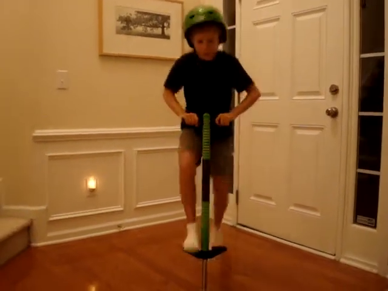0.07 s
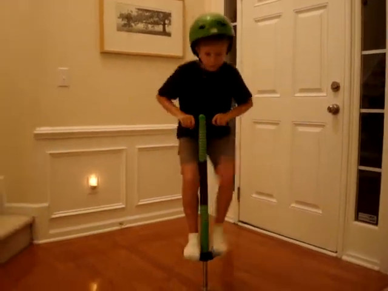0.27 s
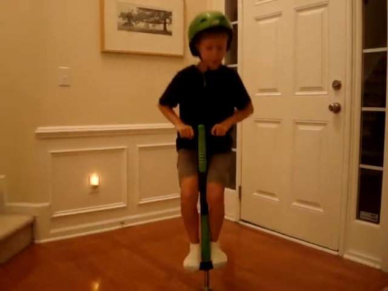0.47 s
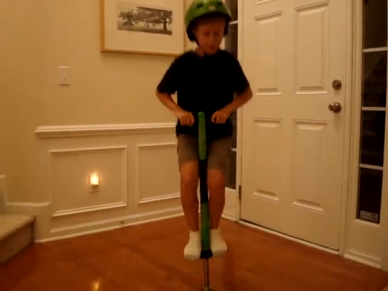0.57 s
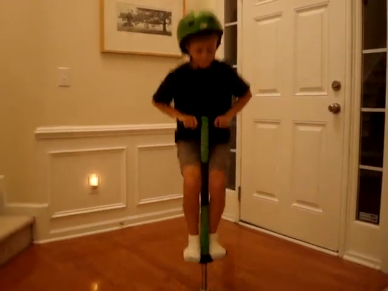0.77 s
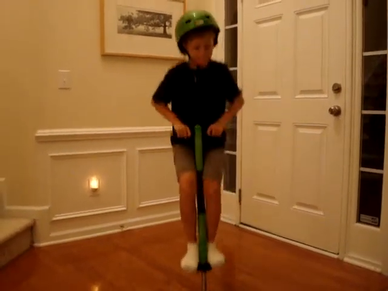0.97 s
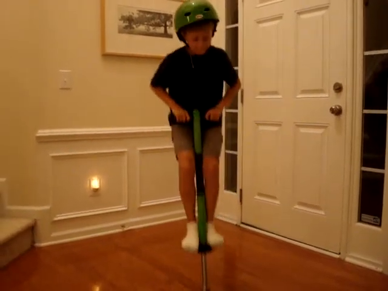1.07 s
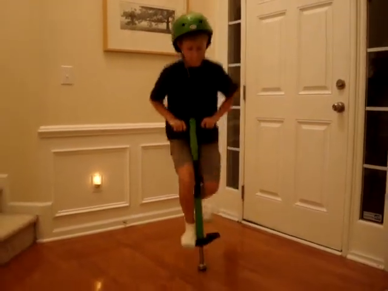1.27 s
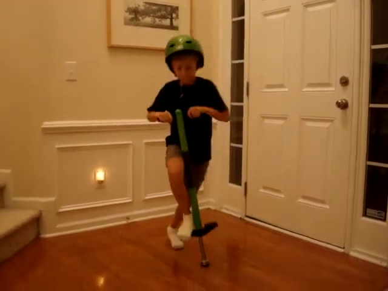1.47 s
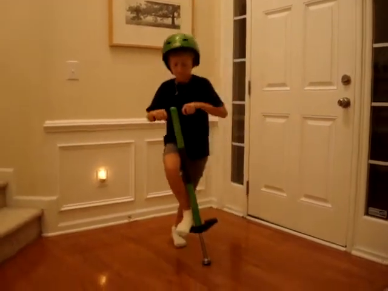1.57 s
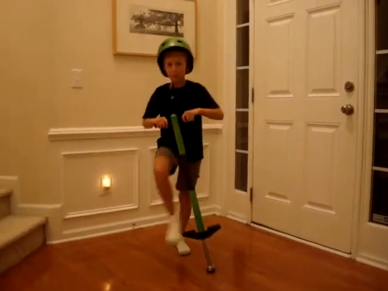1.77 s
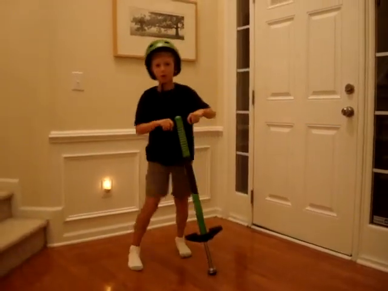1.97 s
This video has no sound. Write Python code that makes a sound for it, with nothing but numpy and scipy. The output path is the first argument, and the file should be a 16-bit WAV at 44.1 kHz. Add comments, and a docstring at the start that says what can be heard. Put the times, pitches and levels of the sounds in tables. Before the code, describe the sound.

A pogo stick bounces on hardwood in a bare, echoing hall: a light scuff and clack, a short high squeak, then three louder metallic clacks with spring chatter, ending in faint scuffs, heard from a few metres.

```python
"""Pogo stick in a bare hall

A spring pogo stick is mounted and bounced on a hardwood floor, the microphone a few metres away.
After a faint rustle, tiny contacts ring the steel as the spring chatters; the shaft clacks on its stop.
Rising tones squeak inside dry rubs, slips scuff on the wood, and the floorboards thump in broad resonances.
Random dense echoes surround the stick; a soft hissing scuff closes, over sinking room tone."""
import sys
import numpy as np
from scipy import signal
from scipy.fft import rfft, irfft, next_fast_len
from scipy.io import wavfile
from scipy.ndimage import uniform_filter1d

SR = 44100
rng = np.random.default_rng(int(sys.argv[2]) if len(sys.argv) > 2 else 0)


def inscribe(sig):
    """Save sig as 16-bit PCM at rate SR to the path in sys.argv[1].

    A 1-D sig is mono; a 2-D sig holds one channel per row.
    Samples are clipped to [-1, 1] before scaling.
    """
    pcm = np.round(np.clip(np.atleast_2d(sig).T, -1, 1) * 32767)
    wavfile.write(sys.argv[1], SR, pcm.astype(np.int16))


N = 88596
TIME = np.arange(N) / SR  # s

# Source levels are set before any direct gain, steel ringing or hall.
# Swell is the rise time, fade the 1/e decay time; tilt pivots at 2 kHz.

# spectrum of the room's background noise: f/Hz, level/dB
AIR_COLOUR = [(25, -22), (70, -5), (120, 4.5), (180, -1), (340, 5.5), (900, 3), (1300, 1), (1650, 0.5),
              (3000, -5.5), (7000, -9), (10000, -14.5)]
AIR_START_DB, AIR_FALL_DB_PER_S = -49.5, 3
WHINE_HZ, WHINE_DB, WHINE_WIDTH_HZ = 7470, -69, 40

# a faint rustle at the start, then brief metallic rings as the spring flexes:
# t/s, level/dB, swell/s, fade/s, f/Hz, width/Hz
RUSTLE_AND_RINGS = [(0.066, -56.5, 0.02, 0.1, 1620, 180), (0.736, -31, 0.035, 0.048, 1657, 101),
                    (1.191, -22, .014, 0.01, 1730, 110), (1.715, -46, 0.014, 0.029, 1436, 50)]

# modes of the steel tube and spring: f/Hz, level over the contact noise/dB, t60/s
STEEL_MODES = [(1054, -4.5, 0.069), (1474, -12.5, 0.22), (1600, 5, 0.13), (1720, -0.5, 0.26),
               (1877, 0, 0.52), (1995, -22, 0.44), (2285, -12, 0.15), (2446, 7, 0.47), (2940, -9, .25),
               (3000, -20.5, 0.41), (4350, -4.5, 0.02), (5360, -15.5, 0.21), (6500, -1.5, 0.22),
               (6810, 1.5, 0.072)]
CONTACTS_PER_S, SLIPS_PER_S, CONTACT_SPREAD_DB = 3000, 3000, 2

# reverberation time of the hall by band: f/Hz, t60/s
HALL_T60 = [(150, 0.72), (800, 0.72), (2000, 0.68), (5500, 0.52), (10000, 0.47)]
HALL_LENGTH_S, HALL_GAP_S, HALL_BUILD_S = 0.8, 0.0015, 0.0032
HALL_DB, DIRECT_DB = 0.5, 4

# the shaft hits its stop: t/s, crack level/dB, rattle level/dB, rattle swell/s, rattle fade/s,
# rattle tilt/(dB per octave)
STOP_BLOWS = [(0.2490, -27.5, -33.5, 0.01, 0.03, 1.0), (0.7253, -13.5, -23, .004, 0.054, -2),
              (1.167, -13, -24, 0.013, 0.044, -2), (1.3478, -13, -21.5, 0.032, 0.021, -0.5)]
# spectrum of crack and rattle: f/Hz, level/dB
CLACK_COLOUR = [(60, -57), (140, -38), (260, -33.5), (450, -13.5), (700, -5.5), (1100, 1), (1700, 0),
                (2600, 3.5), (4500, 1), (7000, -0.5), (10000, -11.5)]
CRACK_FADE_S, CRACK_TO_HALL_DB = 0.0055, -7.5

# hollow scuffs, as of rubber on wood: t/s, level/dB, swell/s, fade/s, lower f/Hz, upper f/Hz,
# upper level against lower/dB
SCUFFS = [(0.257, -25, .024, 0.031, 928, 1720, -6.5), (0.595, -35, 0.05, 0.046, 1145, 1480, -4.5),
          (1.382, -26, 0.008, 0.056, 832, 1410, 1), (1.667, -43.5, 0.033, .020, 993, 1190, -9),
          (1.700, -43, 0.035, 0.012, 956, 1410, 9)]
SCUFF_WIDTH_HZ, SCUFF_LOW_CUT_HZ, SCUFF_HISS_DB = 200, 710, -24

# the shaft squeaks in its guide: t at the loudest/s, level/dB, 1/e half length/s, middle f/Hz,
# level sent into the hall/dB
SQUEAKS = [(0.2707, -22, 0.0057, 4290, -7.5), (0.445, -30.5, 0.012, 3460, -0.5),
           (0.4625, -10, 0.007, 3515, -5)]
# spectrum of the dry rub around each squeak: f/Hz, level/dB
RUB_COLOUR = [(200, -27), (1000, -7), (2500, -4.5), (3500, -1.5), (4800, -3), (6800, -3), (8000, -13.5),
              (10000, -20.5)]
SQUEAK_RISE_HZ, SQUEAK_JITTER_HZ = 130, 79  # rise each side of the middle; rms jitter
OCTAVE_DB = -23
RUB_DB, RUB_HALF_S = -24.5, 0.021  # level against the squeak; 1/e half length

# the spring chatters in the tube; the last row is the soft hiss of the closing scuff:
# t/s, level/dB, swell/s, fade/s, tilt/(dB per octave)
CHATTERS_AND_HISS = [(0.306, -41, 0.026, 0.053, 3), (0.500, -45.5, 0.085, 0.046, 2.9),
                     (0.642, -28, 0.013, 0.025, -1.0), (0.849, -35, 0.037, 0.093, -3.5),
                     (0.952, -28, 0.025, 0.053, 0.5), (1.055, -29, .020, 0.049, 0.4),
                     (1.103, -26, 0.018, 0.038, 2.1), (1.255, -43, 0.026, 0.012, -1.5),
                     (1.449, -38, 0.017, 0.012, 1.5), (1.527, -33.5, 0.0097, 0.034, 3.1),
                     (1.705, -48.5, 0.012, 0.021, 0)]
# spectrum of the chatter and the hiss: f/Hz, level/dB
CHATTER_COLOUR = [(60, -51.5), (150, -36.5), (300, -16), (480, -5), (680, 6.5), (1050, 6), (1700, 3),
                  (3000, 1.5), (4300, 1), (7000, -4.5), (10000, -16)]

# the foot loads the floorboards: t/s, level/dB, swell/s, fade/s, lower resonance f/Hz
THUMPS = [(0.439, -51, 0.011, 0.021, 372), (0.645, -41, 0.0088, 0.0085, 381),
          (0.821, -39, .030, 0.043, 158.3), (1.107, -35, 0.014, 0.0063, 375),
          (1.344, -44.5, .003, 0.016, 200)]
BOARD_RATIO, BOARD_WIDTH_HZ, BOARD_UPPER_DB = 2.15, 58, 1.5
BOARD_GRAIN_DB, BOARD_LOW_CUT_HZ = -4.5, 110  # broad rumble beside the resonances; lower edge

# short low jolts that come with the squeak and the clacks: t/s, level/dB, f of the push/Hz
JOLTS = [(0.463, -49, 130), (0.724, -43, 110), (1.167, -46, 130), (1.3450, -48, 330)]
JOLT_LOW_CUT_HZ = 25

CUTOFF_HZ = 10100  # top of the recorded band


def from_db(db):
    """Decibels to gain."""
    return 10 ** (np.asarray(db) / 20)


def rms_one(x):
    """Scale to unit power."""
    return x / np.sqrt(np.mean(x ** 2) + 1e-20)


def at_hz(points, hz):
    """Read a table on a log-frequency axis."""
    f, value = np.transpose(points)
    return np.interp(np.log(hz + 1e-9), np.log(f), value)


def colour(x, points, tilt_db=0):
    """Causal (minimum-phase) filter with the given curve, tilted about 2 kHz; unit power gain."""
    size = 2 * next_fast_len(N // 2 + 4096)
    hz = np.arange(size // 2 + 1) * SR / size
    db = at_hz(points, hz) + tilt_db * np.log2(np.clip(hz, 300, 10000) / 2000)
    db = db - np.clip((hz - CUTOFF_HZ) / 100, 0, 30)
    # folding the cepstrum onto positive times gives minimum phase
    cepstrum = irfft(np.log(rms_one(from_db(db))))
    cepstrum[1:size // 2] *= 2
    cepstrum[size // 2 + 1:] = 0
    response = np.exp(rfft(cepstrum))
    return irfft(rfft(x, size) * response)[:N]


def resonate(x, hz, width_hz):
    """One resonance with gain 1 on top."""
    r = np.exp(-np.pi * width_hz / SR)
    numerator = np.array([1, 0, -1]) * (1 - r * r) / 2
    denominator = [1, -2 * r * np.cos(2 * np.pi * hz / SR), r * r]
    return signal.lfilter(numerator, denominator, x + 1e-18)


def high_pass(x, order, hz):
    """Butterworth low cut."""
    return signal.sosfilt(signal.butter(order, hz, "high", fs=SR, output="sos"), x)


def stroke(start, swell, fade):
    """Envelope that swells to 1 and dies away."""
    age = TIME - start
    rise = np.sqrt(np.clip(age / max(swell, 1e-4), 0, 1))
    return rise * np.exp(-np.maximum(age - swell, 0) / max(fade, 1e-4))


def contacts(per_s):
    """Uneven tiny impacts at random moments, with an even mean power."""
    sizes = from_db(CONTACT_SPREAD_DB * rng.standard_normal(N)) * rng.choice([-1, 1], N)
    clicks = sizes * (rng.random(N) < per_s / SR)
    local_power = np.abs(uniform_filter1d(clicks ** 2, size=500))
    return clicks / np.sqrt(local_power + 1e-6)


def room_tone():
    """Soft, slowly sinking background noise with a thin, steady high whine."""
    air_gain = from_db(AIR_START_DB - AIR_FALL_DB_PER_S * TIME)
    air = air_gain * colour(rng.standard_normal(N), AIR_COLOUR)
    whine = rms_one(resonate(rng.standard_normal(N), WHINE_HZ, WHINE_WIDTH_HZ))
    return air + from_db(WHINE_DB) * whine


def rustle_and_rings():
    """Small contacts through one resonance each: first a faint rustle, then rings of the flexing spring."""
    out = 0
    for s, db, swell, fade, hz, width_hz in RUSTLE_AND_RINGS:
        band = rms_one(resonate(contacts(SLIPS_PER_S), hz, width_hz))
        out = out + from_db(db) * stroke(s, swell, fade) * band
    return out


def steel(x):
    """Contacts set the tube and spring ringing; each mode's width follows from its decay time."""
    ringing = 0
    for hz, db, t60 in STEEL_MODES:
        width_hz = np.log(1000) / np.pi / t60
        ringing = ringing + from_db(db) * resonate(x, hz, width_hz)
    return x + ringing


def hall(x):
    """Dense reflections that build fast and die band by band; new each call, as the stick moves about."""
    size = int(HALL_LENGTH_S * SR)
    noise = rfft(rng.standard_normal(size))
    hz = np.arange(size // 2 + 1) * SR / size
    t = TIME[:size]
    tail = 0
    for centre, t60 in HALL_T60:
        # overlapping bands that add up to 1
        share = at_hz([(f, f == centre) for f, _ in HALL_T60], hz)
        tail = tail + irfft(noise * share, size) * from_db(-60 * t / t60)
    tail = tail * np.clip((t - HALL_GAP_S) / HALL_BUILD_S, 0, 1)
    unit_energy_tail = rms_one(tail) / np.sqrt(size)
    return from_db(HALL_DB) * signal.fftconvolve(x, unit_energy_tail)[:N]


def clacks():
    """Each blow on the stop is a sharp crack, then loose parts rattle; each has echoes of its own."""
    out = 0
    for s, crack_db, rattle_db, swell, fade, tilt_db in STOP_BLOWS:
        blow = from_db(crack_db) * stroke(s, 0, CRACK_FADE_S) * rng.choice([-1, 1], N)
        crack = steel(colour(blow, CLACK_COLOUR, tilt_db=-2.0))
        knocks = from_db(rattle_db) * stroke(s, swell, fade) * contacts(CONTACTS_PER_S)
        rattle = steel(colour(knocks, CLACK_COLOUR, tilt_db))
        echoes = hall(rattle + from_db(CRACK_TO_HALL_DB) * crack)
        out = out + crack + from_db(DIRECT_DB) * rattle + echoes
    return out


def scuffs():
    """Rapid slips excite two hollow resonances and a little hiss."""
    out = 0
    for s, db, swell, fade, low_hz, high_hz, high_db in SCUFFS:
        slips = contacts(SLIPS_PER_S)
        lower = resonate(slips, low_hz, SCUFF_WIDTH_HZ)
        upper = resonate(slips, high_hz, SCUFF_WIDTH_HZ * high_hz / low_hz)
        body = lower + from_db(high_db) * upper
        body = signal.sosfilt(signal.butter(2, 2 * high_hz, fs=SR, output="sos"), body)
        scuff = rms_one(body) + from_db(SCUFF_HISS_DB) * slips
        out = out + from_db(db) * stroke(s, swell, fade) * scuff
    return high_pass(out, 5, SCUFF_LOW_CUT_HZ)


def squeaks():
    """Short rising stick-slip tones, each inside a longer dry rub, with their echoes."""
    tones, sent, rub_level = 0, 0, 0
    for s, db, half, hz, hall_db in SQUEAKS:
        age = TIME - s
        jitter = rms_one(uniform_filter1d(rng.standard_normal(N), size=80))
        pitch = hz + SQUEAK_RISE_HZ * np.tanh(age / half) + SQUEAK_JITTER_HZ * jitter
        phase = 2 * np.pi * np.cumsum(pitch) / SR
        wave = np.sin(phase) + from_db(OCTAVE_DB) * np.sin(2 * phase)
        tone = from_db(db) * np.exp(-(age / half) ** 2) * wave
        tones = tones + tone
        sent = sent + from_db(hall_db) * tone
        rub_level = rub_level + from_db(db + RUB_DB) * np.exp(-(age / RUB_HALF_S) ** 2)
    rub = colour(rub_level * contacts(SLIPS_PER_S), RUB_COLOUR)
    return tones + from_db(DIRECT_DB) * rub + hall(sent + rub)


def chatter_and_hiss():
    """Coils scrape along the tube in bursts of small contacts; a last burst is the closing scuff's hiss."""
    out = 0
    for s, db, swell, fade, tilt_db in CHATTERS_AND_HISS:
        burst = from_db(db) * stroke(s, swell, fade) * contacts(CONTACTS_PER_S)
        out = out + colour(burst, CHATTER_COLOUR, tilt_db)
    return out


def floorboards():
    """The boards rumble in two resonances and a broad grain as the weight comes down."""
    out = 0
    for s, db, swell, fade, hz in THUMPS:
        push = contacts(CONTACTS_PER_S)
        lower = resonate(push, hz, BOARD_WIDTH_HZ)
        upper = resonate(push, hz * BOARD_RATIO, BOARD_WIDTH_HZ)
        boards = lower - from_db(BOARD_UPPER_DB) * upper
        grain = resonate(contacts(CONTACTS_PER_S), 2 * hz, 3 * hz)
        grain = resonate(grain, 2 * hz, 3 * hz)
        thump = rms_one(boards) + from_db(BOARD_GRAIN_DB) * rms_one(grain)
        out = out + from_db(db) * stroke(s, swell, fade) * thump
    return high_pass(out, 2, BOARD_LOW_CUT_HZ)


def jolts():
    """One smooth low push each, rising to its peak and sinking back."""
    out = 0
    for s, db, hz in JOLTS:
        phase = 2 * np.pi * hz * np.maximum(TIME - s, 0)
        out = out + from_db(db) * phase * np.exp(1 - phase)
    return high_pass(out, 1, JOLT_LOW_CUT_HZ)


def scene():
    """The stick, heard from a few metres away in the hall."""
    rubbing = rustle_and_rings() + scuffs() + steel(chatter_and_hiss()) + floorboards()
    stick = from_db(DIRECT_DB) * rubbing + hall(rubbing) + clacks() + squeaks() + jolts()
    return (room_tone() + stick)[None]


def record(dry):
    """The top is cut steeply."""
    return signal.sosfilt(signal.ellip(12, .1, 80, CUTOFF_HZ, fs=SR, output="sos"), dry)


dry = scene()
out = record(dry)
inscribe(out)
```